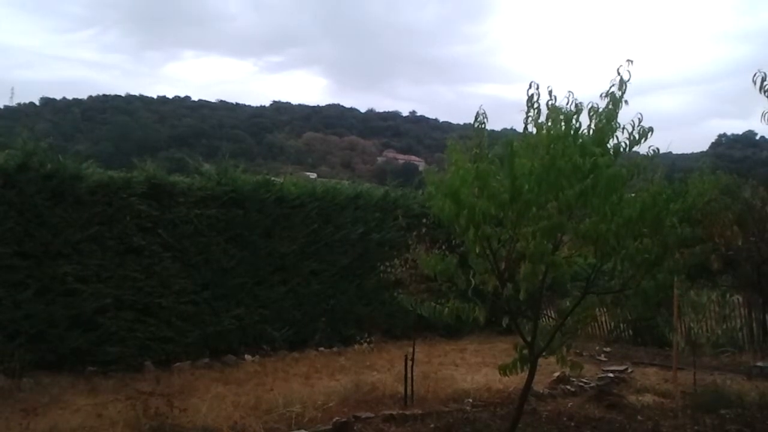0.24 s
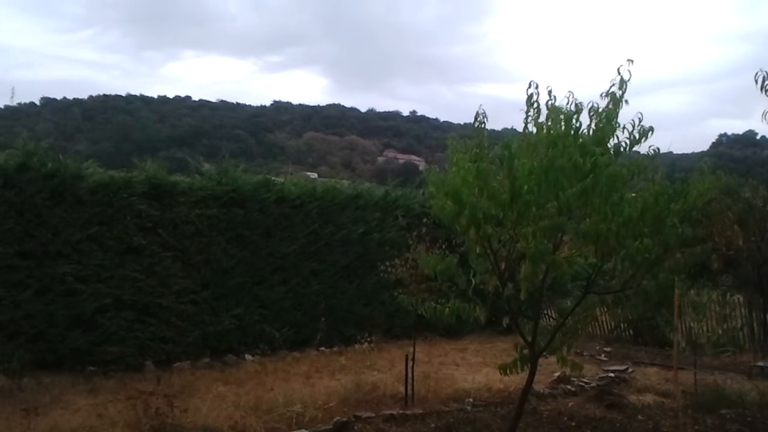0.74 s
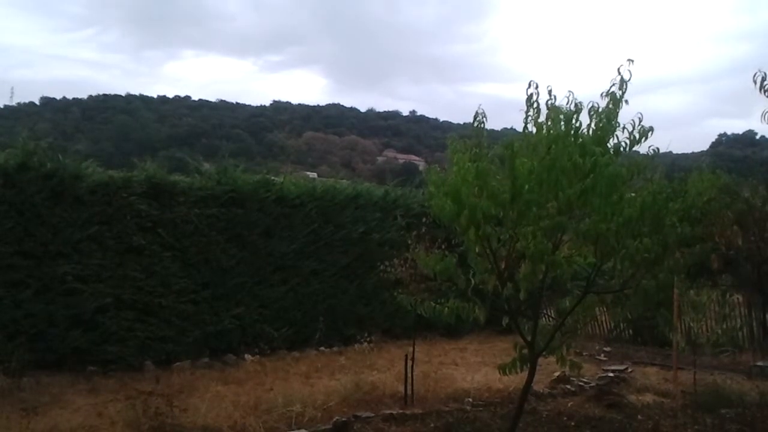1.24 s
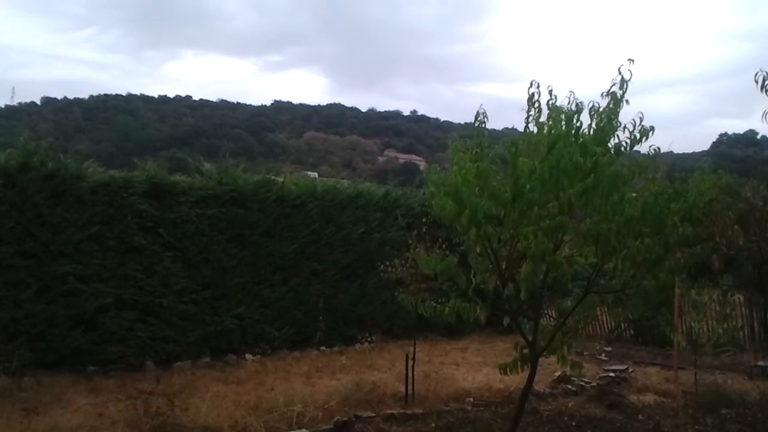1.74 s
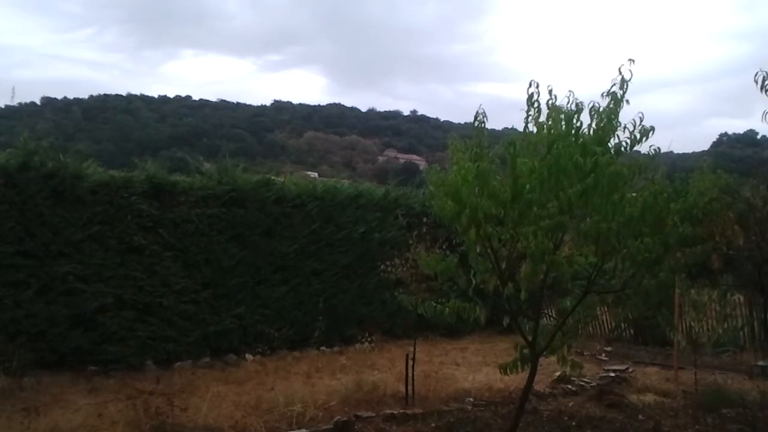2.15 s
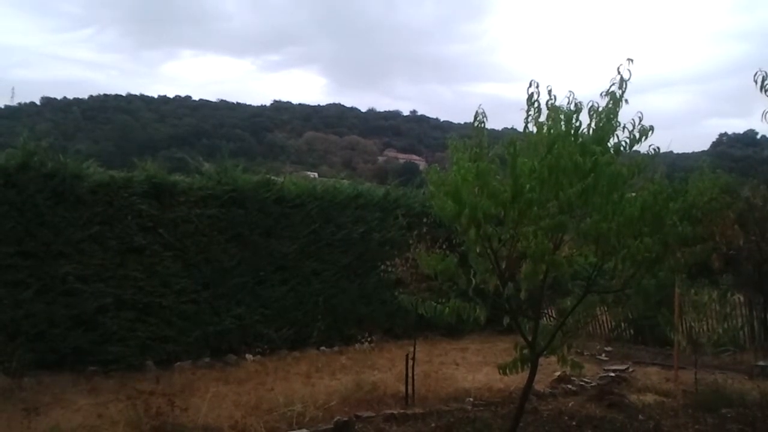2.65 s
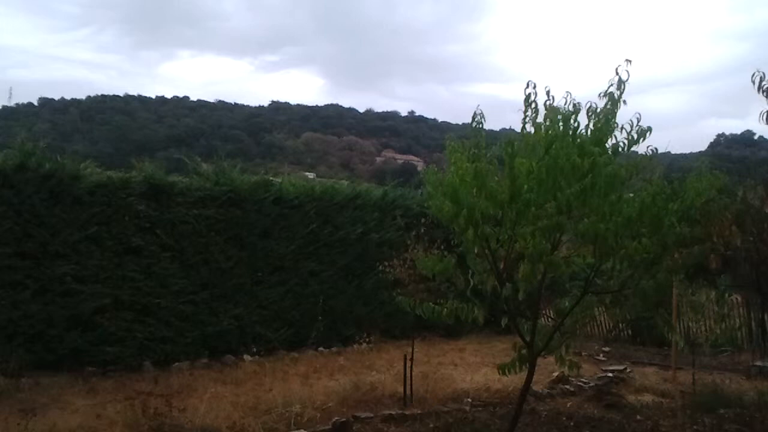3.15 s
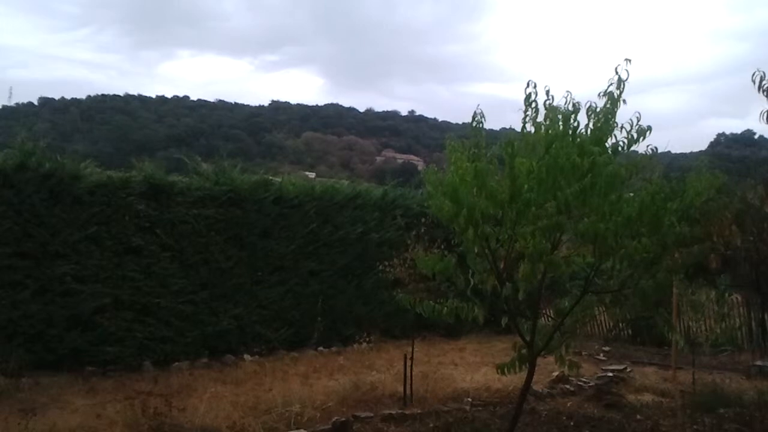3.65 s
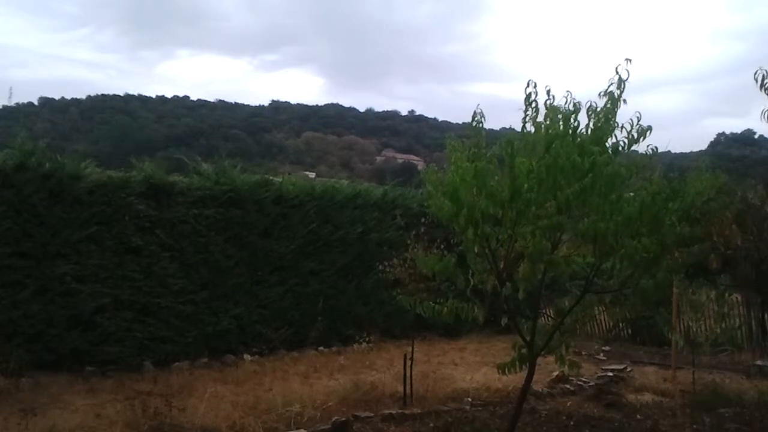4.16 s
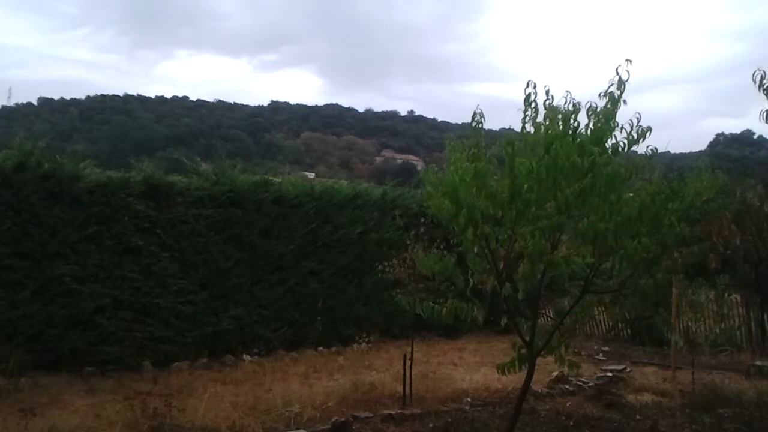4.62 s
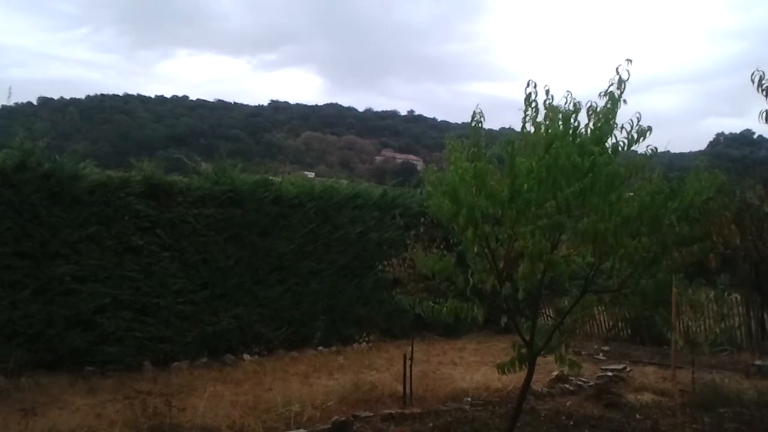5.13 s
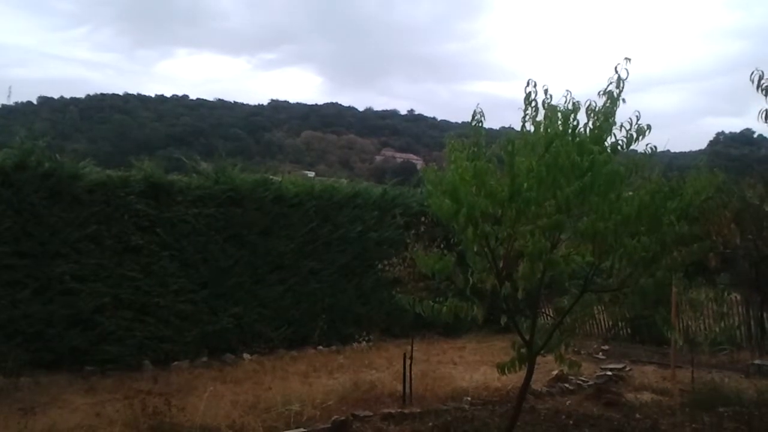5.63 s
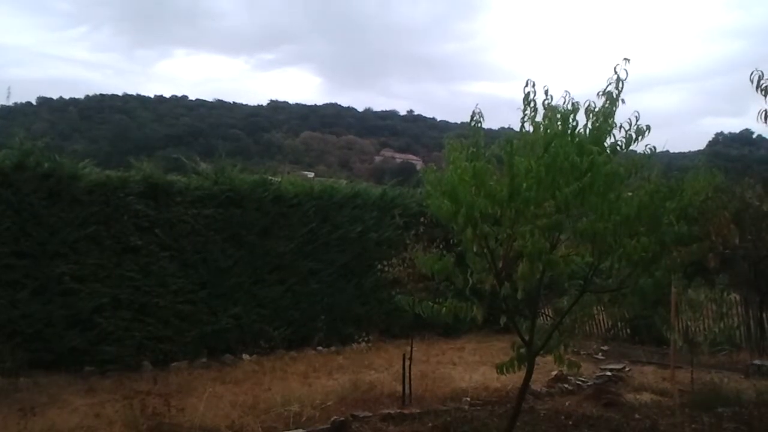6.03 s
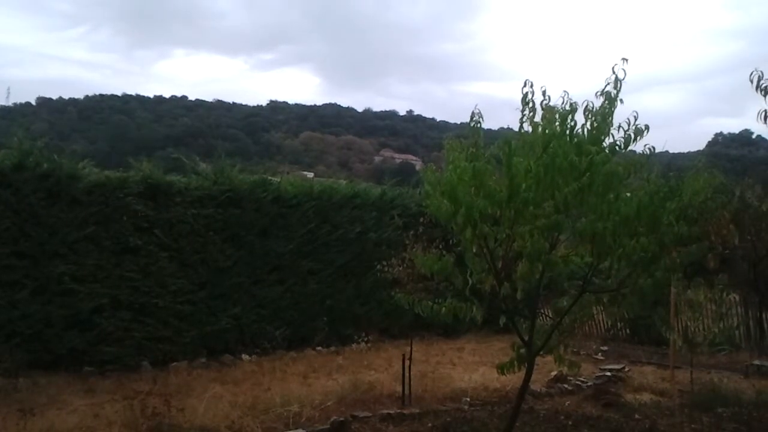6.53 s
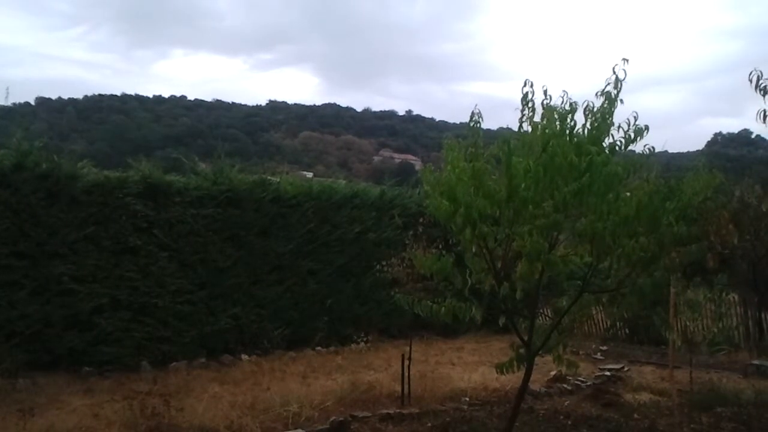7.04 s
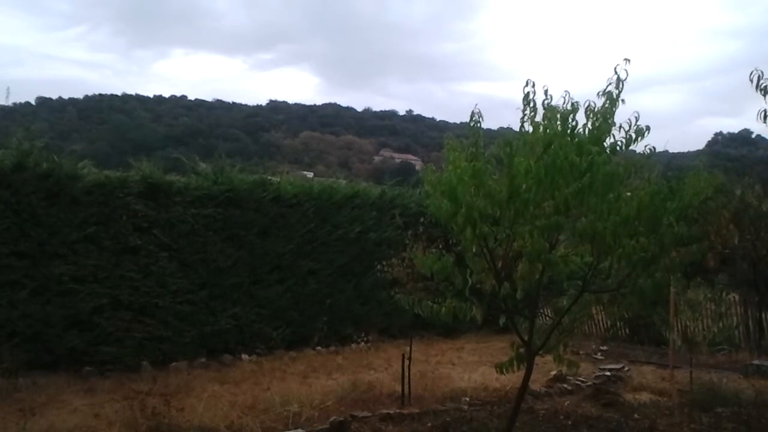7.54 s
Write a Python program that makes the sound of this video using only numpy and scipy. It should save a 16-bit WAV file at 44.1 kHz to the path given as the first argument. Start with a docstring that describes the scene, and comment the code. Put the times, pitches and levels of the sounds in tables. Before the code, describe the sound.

Faraway thunder rolls as soft, smeared bass without any sharp crack, fading and returning late. Over it, close raindrops snap and tick on hard leaves at random, some in quick clusters, a few much louder, each with a tiny echo off a nearby wall. Quiet hissing rain fills the background, and a few drops thud dully on earth. Outdoor sound from a small fixed microphone.

```python
"""A garden in light rain, heard from under a shelter, with thunder rolling far away.
The thunder is shaped noise in three bands; far rain is a patchy hiss of filtered noise.
Drops on hard leaves are damped sines and spatter, with one return off a wall and scattered echoes;
drops on soil are dull taps. The small microphone's treble lift around 7 kHz is part of the rain's colours."""
import sys
import numpy as np
from scipy import signal
from scipy.fft import rfft, irfft, next_fast_len
from scipy.io import wavfile
from scipy.ndimage import uniform_filter1d

SR = 44100
rng = np.random.default_rng(int(sys.argv[2]) if len(sys.argv) > 2 else 0)


def master_out(mix):
    """Clip the mix to full scale and print it as 16-bit PCM to the path in sys.argv[1]."""
    frames = np.transpose(np.atleast_2d(mix))
    ceiling = np.clip(frames, -1, 1)
    pcm = np.round(ceiling * 32767).astype(np.int16)
    wavfile.write(sys.argv[1], SR, pcm)


N = 343098

# colour of the spatter and the scattered echoes: freq_hz, level_db (relative)
SPATTER_COLOUR = [(1000, -29), (3000, -16.5), (5000, -6), (6500, -6), (7500, -2), (8200, 2.5), (9300, -8.5)]
WALL_DELAY_S = .0043  # extra travel time by way of the wall


def amp(db):
    """Gain of a level in dB."""
    return 10 ** (np.asarray(db) / 20)


def unit(x):
    """x scaled to rms 1."""
    return x / np.sqrt(np.mean(x ** 2) + 1e-20)


def curves(rows):
    """One value per sample for each column after the time, in straight lines between rows."""
    times_s, *columns = np.transpose(rows)
    return [np.interp(np.arange(N) / SR, times_s, column) for column in columns]


def coloured(x, points):
    """x filtered through (Hz, dB) points joined on a log frequency axis."""
    size = next_fast_len(x.shape[-1] + 8192)
    freq_hz, level_db = np.transpose(points)
    bins_hz = np.fft.rfftfreq(size, 1 / SR)
    # 1 Hz is added to keep the logarithm finite at zero
    gain = amp(np.interp(np.log(bins_hz + 1), np.log(freq_hz + 1), level_db))
    return irfft(rfft(x, size) * gain, size)[..., :x.shape[-1]]


def noise(points, count=1, size=N):
    """Rows of coloured noise, together at rms 1."""
    return unit(coloured(rng.standard_normal((count, size)), points))


def ping(t, hz, t60, rise):
    """A damped sine from t = 0 that fades 60 dB in t60 seconds after a soft onset."""
    t = np.maximum(t, 0)
    return np.sin(2 * np.pi * hz * t) * amp(-60 * t / t60) * (1 - np.exp(-t / rise))


def place(start_s, rows):
    """Rows of sound summed at their start times."""
    starts = np.round(np.asarray(start_s) * SR).astype(int)[:, None]
    at = starts + np.arange(rows.shape[1])
    return np.bincount(at.ravel(), rows.ravel(), N + SR)[:N]


def off_wall(x, share):
    """x and its delayed copy reflected by the wall."""
    delay = round(WALL_DELAY_S * SR)
    padding = [(0, 0)] * (x.ndim - 1) + [(delay, 0)]
    return x + share * np.pad(x, padding)[..., :-delay]


def thunder():
    """Far thunder, smeared by hills into noise: deep booms, a roll and a grumble above it."""
    # deep booms: crest_s, level_db
    boom_crests = [(.15, -26.5), (.3, -37.5), (.43, -31), (.54, -28), (.67, -30.5), (.76, -32), (.95, -28),
                   (1.1, -33), (1.25, -33), (1.38, -35), (2.99, -41), (3.29, -38.5), (4.48, -39),
                   (4.92, -41.5), (5.24, -47), (5.96, -41), (6.3, -39), (6.42, -27.5), (6.76, -38),
                   (6.89, -30.5), (7.54, -30.5), (7.77, -31.5)]
    # slow swell of the upper thunder: time_s, roll_db, grumble_db
    thunder_levels = [(0, -40.5, -49.5), (.28, -46, -55.5), (.8, -48.5, -53), (1.3, -42, -51),
                      (1.6, -47, -50), (2.34, -46.5, -55), (2.8, -43.5, -50.5), (3.12, -47, -55.5),
                      (4.33, -46.5, -53), (4.5, -38.5, -50.5), (4.9, -47.5, -48.5), (5.32, -44.5, -52.5),
                      (5.5, -43, -56.5), (6.17, -46.5, -50.5), (6.45, -46, -52), (7.13, -51, -56.5),
                      (7.78, -49, -54)]
    # spectral density of each band: freq_hz, level_db (per Hz, relative)
    boom_colour = [(4.7, -38.5), (8.0, -4), (38, -7), (75, -8.5), (98, -31.5), (160, -120)]
    roll_colour = [(38, -23), (65, 0), (97, -4), (134, -1.5), (175, -12.5), (230, -26.5), (390, -120)]
    grumble_colour = [(94, -46), (160, -2), (233, -2), (318, -10), (500, -17), (650, -24), (1100, -120)]
    rise_db_s, fall_db_s = 242, 201  # swell and fade of a boom
    deep_db = -45.5  # steady deep rumble under the booms

    crest_s, crest_db = np.transpose(boom_crests)[:, :, None]
    since_s = np.arange(N) / SR - crest_s
    slope_db_s = np.where(since_s < 0, -rise_db_s, fall_db_s)
    boom_db = np.max(crest_db - slope_db_s * since_s, axis=0)
    roll_db, grumble_db = curves(thunder_levels)

    boom = amp(np.maximum(boom_db, deep_db)) * noise(boom_colour)[0]
    roll = amp(roll_db) * noise(roll_colour)[0]
    grumble = amp(grumble_db) * noise(grumble_colour)[0]
    return boom + roll + grumble


def far_rain():
    """Countless far drops blend into a hiss in faint patches, with a weak copy off the wall."""
    # spectral density of the hiss: freq_hz, level_db (per Hz, relative)
    hiss_colour = [(240, -29.5), (400, -2.5), (640, -3), (750, -0.5), (1050, -4.5), (1200, -3.5),
                   (1800, -6), (2500, -5.5), (3400, -8), (5500, -7), (6500, -3), (7200, -.5), (7900, 0.5),
                   (9300, -1.5)]
    spectrum = signal.stft(rng.standard_normal(N), nperseg=512)[2]
    # random gain, smoothed over neighbouring frequencies and then over time
    patches = uniform_filter1d(rng.standard_normal(spectrum.shape), 12, 0)
    patches = uniform_filter1d(patches, 6, 1)
    patch_db = 1.49 * unit(patches)
    hiss = signal.istft(spectrum * amp(patch_db), nperseg=512)[1][:N]
    return amp(-44.5) * unit(off_wall(coloured(hiss, hiss_colour), 0.017))


def splash(t, hz):
    """One arrival per row: the bright tick of impact, a rebound of the droplet and spatter."""
    luck = rng.standard_normal((len(hz), 3))
    tick = 3.6 * ping(t, hz * (1 + .04 * luck[:, 2:]), .004, .0003)
    # a second, higher ping: the small microphone's treble peak excited by the tick
    tick += 1.7 * ping(t, 7900 + 200 * luck[:, 2:], .004, .0003)
    rebound_t = t - .0014 - .0002 * luck[:, 1:2]
    rebound = amp(-3 + 2.5 * luck[:, :1]) * ping(rebound_t, hz, .005, .0003)
    spatter = amp(-5 - 60 * t / .035) * (t > 0)
    spatter = spatter * noise(SPATTER_COLOUR, count=len(hz), size=t.shape[1])
    return tick + rebound + spatter


def leaf(t, knock_hz, knock_db, slap_db, slap_hz):
    """The flat slap on the leaf, a broad band of noise, and the short knock it rings with."""
    octaves = np.log2((np.fft.rfftfreq(t.shape[1], 1 / SR) + 1) / slap_hz)
    slap = irfft(rfft(rng.standard_normal(t.shape)) * amp(-2 * octaves ** 2), t.shape[1])
    slap /= slap.std(axis=1, keepdims=True)
    knock = ping(t, knock_hz, 0.027, 0.000085)
    return amp(slap_db - 60 * t / 0.017) * slap + amp(knock_db + 3) * knock


def ticks(start_s, db, echo_db, hz, knock_hz, knock_db, slap_db, slap_hz, tail_db):
    """Each drop arrives straight, again off the wall, then as scattered echoes from the garden."""
    t = np.arange(2800)[None] / SR + 0 * db  # one row of time per drop
    late_t = t - WALL_DELAY_S - .0001 * rng.standard_normal(db.shape)
    echo = amp(echo_db)
    louder = np.maximum(echo, 1)  # the stronger of the straight and the wall arrival
    bright = splash(t, hz) + echo * splash(late_t, hz)
    tail = louder * amp(tail_db - 60 * t / 0.094) * (late_t > 0)
    bright += tail * noise(SPATTER_COLOUR, count=len(db), size=t.shape[1])
    body = off_wall(leaf(t, knock_hz, knock_db, slap_db, slap_hz), 0.73 * echo) / louder
    return place(start_s.ravel(), amp(db) * bright + body)


def small_drops(count=480):
    """Fainter drops tick on leaves at random moments, swelling in flurries."""
    # base level of the faint drops: time_s, level_db (relative)
    flurries = [(0, -49), (.56, -55.5), (.9, -48.5), (1.5, -51), (1.8, -51), (2.55, -51), (3.4, -54),
                (3.8, -49.5), (4, -52), (4.9, -50.5), (5.3, -54.5), (5.9, -48.5), (6.6, -55.5),
                (7.78, -52.5)]
    moment, strength, pitch = rng.random((count, 3)).T[:, :, None]
    slap_luck, echo_luck, tick_luck = rng.standard_normal((count, 3)).T[:, :, None]
    db = curves(flurries)[0][(moment * N).astype(int)] + 6 * strength
    knock_hz = 800 + 3200 * pitch
    return ticks(moment * N / SR, db, 3 * echo_luck, 7000 + 500 * tick_luck, knock_hz,
                 knock_db=db - 21.5, slap_db=db - 12.0 + 3.3 * slap_luck,
                 slap_hz=knock_hz, tail_db=0.5)


def near_drops():
    """The drops one can point at, close by on hard leaves; larger, lower leaves slap lower."""
    # near drops, levels relative: start_s, tick_db, echo_db (against the tick),
    # knock_hz, knock_db, slap_db
    leaf_drops = [(0.055, -37, -4, 1610, -53, -58), (0.116, -36, 9, 2960, -53, -43),
                  (0.4542, -39.5, 6, 2040, -49, -46), (0.633, -32.5, -8, 1100, -44.5, -37),
                  (0.76, -40, 1, 1650, -44.5, -35.5), (0.841, -29, -0.5, 1010, -38.5, -34.5),
                  (0.917, -41, -3, 2000, -62, -46), (0.928, -37, 1, 1440, -52, -45),
                  (0.959, -22.5, -6.5, 1680, -42.5, -39), (1.0544, -42, 4, 2540, -51, -42),
                  (1.0694, -37, -1, 600, -66, -56), (1.471, -31.5, -10, 840, -63, -55),
                  (1.598, -35, 4, 2380, -40, -31.5), (1.6746, -29.5, 1, 2640, -41, -38.5),
                  (1.729, -37, 0, 2500, -60, -57), (1.742, -36, 5, 3040, -54, -40),
                  (1.7898, -32, -7, 2170, -50, -33), (1.8508, -27, -4, 1230, -40, -34),
                  (1.8833, -34.5, 3, 1280, -41, -34), (2.216, -33.5, 0.5, 600, -49, -47),
                  (2.3196, -32.5, 8, 2290, -43, -25.5), (2.6362, -39.5, -4, 2650, -54, -42),
                  (2.667, -42, 7, 1460, -53, -43), (2.713, -36.5, -1, 2500, -61, -53),
                  (2.7197, -37, 1, 1550, -46.5, -38), (2.89, -50, 0, 1670, -49, -46),
                  (3.0129, -36.5, 4.5, 2800, -54, -37), (3.134, -38, 3, 2860, -53, -44),
                  (3.2313, -27, 0.5, 2990, -58, -41), (3.4581, -51, 5, 1000, -44, -41),
                  (3.571, -19, -1.5, 1650, -44, -37.5), (3.7494, -33, -6, 1100, -51, -49),
                  (3.775, -34, -16, 2210, -61, -62), (3.873, -35, -6, 2080, -56, -51),
                  (3.9172, -26.5, 1.5, 1180, -44, -61), (3.973, -37, 5.5, 2560, -53, -36.5),
                  (4.0504, -34.5, -13, 1570, -51, -52), (4.085, -37, -10, 1500, -62, -60),
                  (4.1008, -39, 4, 940, -61, -57), (4.119, -34, -4, 1980, -55, -44),
                  (4.296, -34, 4, 1760, -47, -50), (4.3338, -34, -6, 2430, -50, -40),
                  (4.5112, -37.5, 3, 605, -44, -42), (4.836, -40, -4, 2480, -66, -42),
                  (4.8805, -33.5, -12, 595, -49, -40.5), (4.8986, -34.5, -1.5, 1080, -61, -51),
                  (4.985, -44, -8, 2500, -62, -50), (5.0277, -38, -1, 1400, -55, -45),
                  (5.0576, -34, 6, 2850, -48, -40), (5.103, -37.5, -17, 2800, -60, -52),
                  (5.3167, -46, 13, 2440, -54, -38.5), (5.3562, -37, -5, 1240, -55, -47),
                  (5.4394, -32.5, -4, 2990, -55, -45), (5.455, -34.5, -3, 2860, -55, -52),
                  (5.4774, -45, -2, 730, -53, -49), (5.609, -48, -8, 1410, -55, -50),
                  (5.7648, -34.5, 2.5, 1610, -61, -37), (5.817, -39, -1, 1320, -66, -46),
                  (5.907, -31, 1, 2010, -63, -52), (5.914, -26.5, 1, 1180, -47.5, -46),
                  (6.017, -40.5, 1, 1450, -56, -60), (6.036, -33.5, -6, 1000, -51, -50),
                  (6.102, -43, -10, 2000, -60, -55), (6.2894, -32, -8, 980, -46, -39),
                  (6.386, -35.5, 3, 1700, -52, -42), (6.5234, -49, 8.5, 2640, -63, -35),
                  (6.586, -33.5, -5, 2950, -59, -46), (6.692, -44, 9, 583, -44, -53),
                  (6.7141, -32, -3, 710, -59, -50), (6.8504, -29.5, 0.5, 1100, -40, -40),
                  (6.9625, -30, -6, 1650, -50.5, -47), (7.297, -40, 5, 1450, -61, -44),
                  (7.3581, -31.5, 1, 2550, -57, -40), (7.514, -20, -5.5, 800, -37, -32)]
    start_s, db, echo_db, knock_hz, knock_db, slap_db = np.transpose(leaf_drops)[:, :, None]
    hz = 6990 + 460 * rng.standard_normal(db.shape)  # pitch of a tick and its scatter
    slap_hz = 2140 * (knock_hz / 1500) ** 0.25
    return ticks(start_s, db, echo_db, hz, knock_hz, knock_db, slap_db, slap_hz, tail_db=-7)


def pats():
    """Drops on soil give a short dull tap and one low push, with no ring."""
    # drops on soil: start_s, level_db (relative), pitch_hz
    soil_drops = [(1.9531, -36, 2200), (2.427, -39, 1490), (3.5462, -25, 1880), (3.6298, -34, 1500),
                  (4.15, -32.5, 1190), (4.3805, -34.5, 1800), (5.745, -39, 1310)]
    start_s, db, hz = np.transpose(soil_drops)[:, :, None]
    t = np.arange(900)[None] / SR
    tap = ping(t, hz, 0.0022, 0.0004)
    push = .7 * ping(t - .0008, 0.2 * hz, 0.0041, 0.0001)
    return place(start_s.ravel(), amp(db + 9.5) * (tap - push))


def scene():
    """Everything reaches one microphone."""
    return (thunder() + far_rain() + small_drops() + near_drops() + pats())[None]


def record(dry):
    """The recorder rolls off ever faster above 6.8 kHz and keeps nothing above its band limit."""
    offset, top_hz = .0008, 9170  # steady offset of the converter; band limit
    size = next_fast_len(N + 8192)
    hz = np.fft.rfftfreq(size, 1 / SR)
    roll_off = amp(-3.5 * (np.maximum(hz - 6800, 0) / 1000) ** 3)
    return irfft(rfft(dry + offset, size) * roll_off * (hz < top_hz), size)[:, :N]


dry = scene()
out = record(dry)
master_out(out)
```